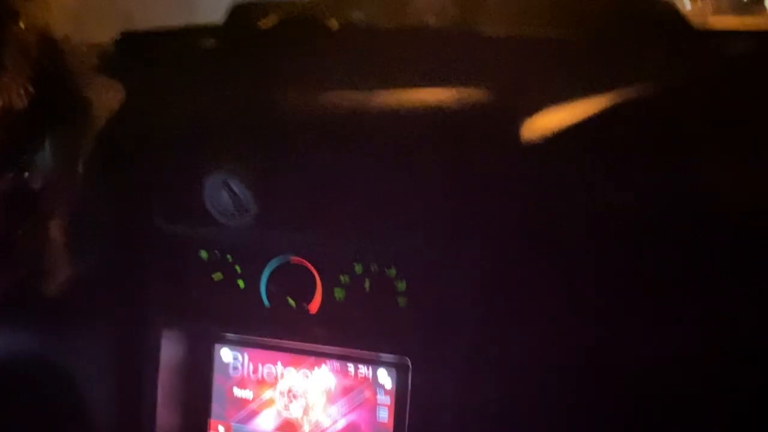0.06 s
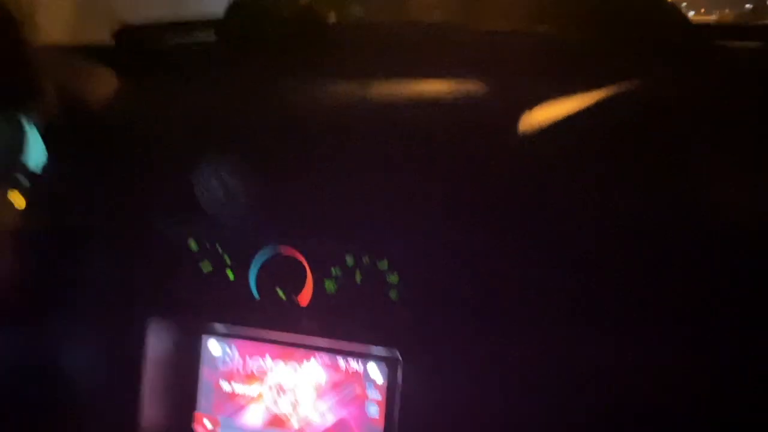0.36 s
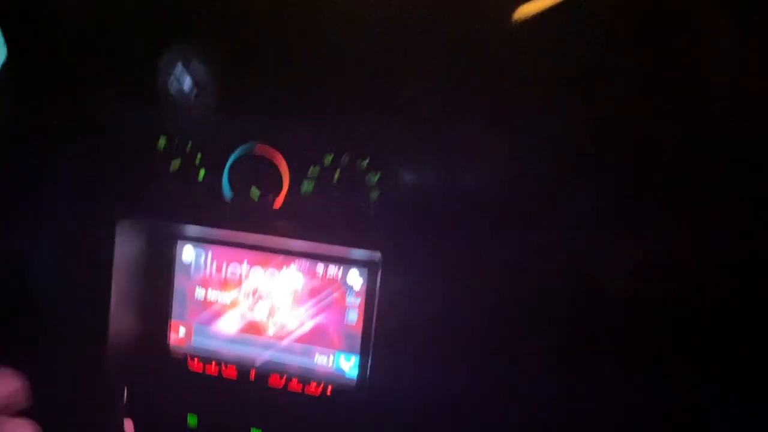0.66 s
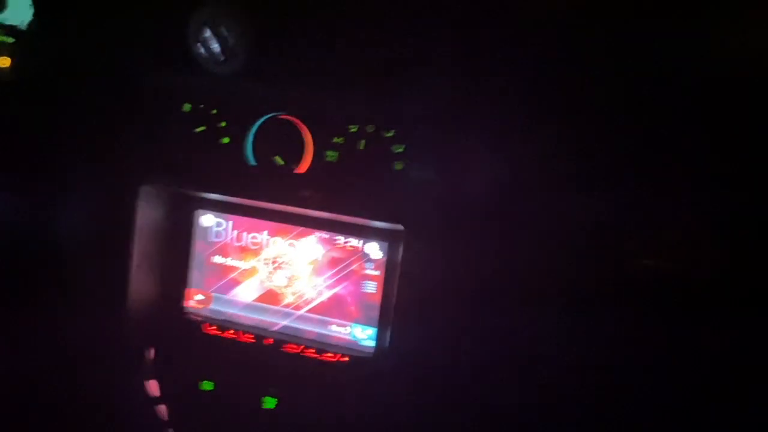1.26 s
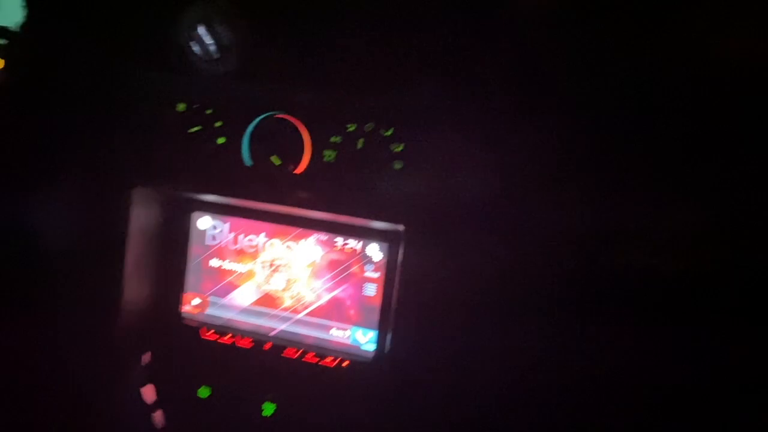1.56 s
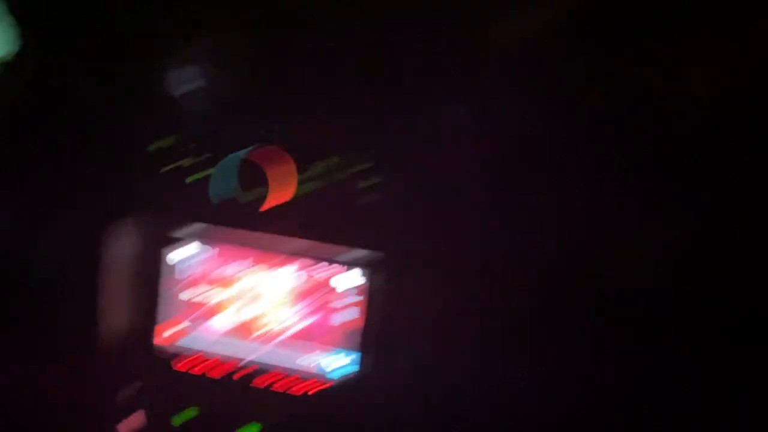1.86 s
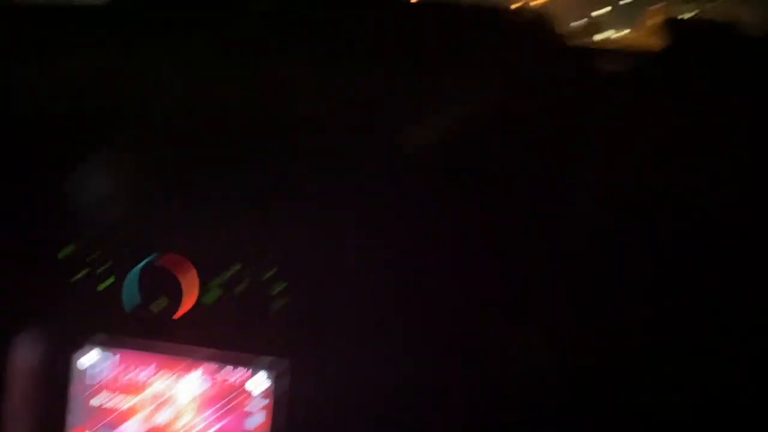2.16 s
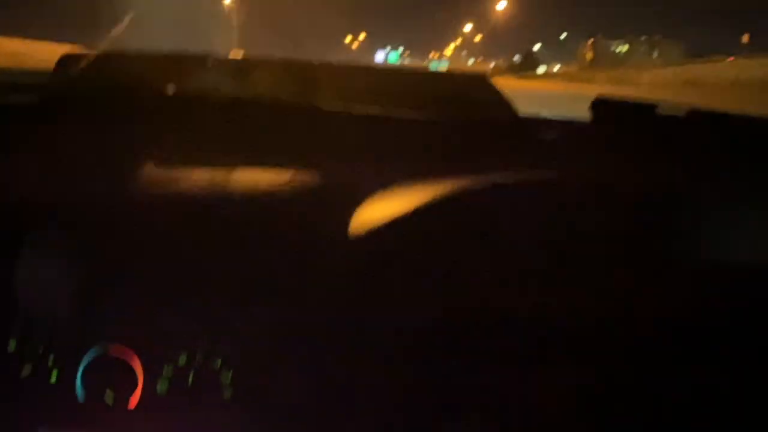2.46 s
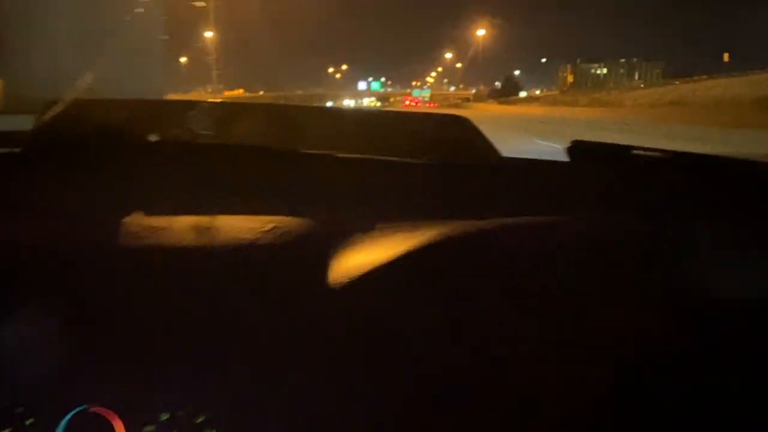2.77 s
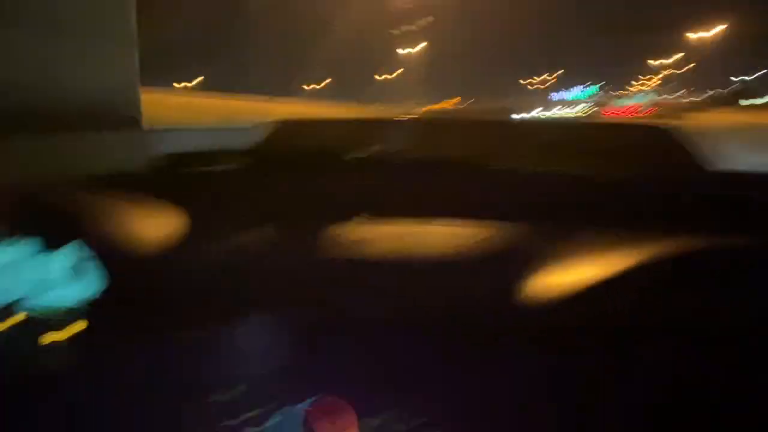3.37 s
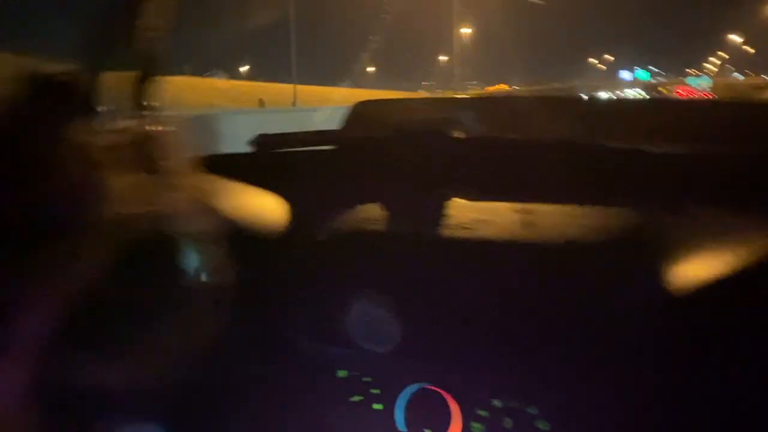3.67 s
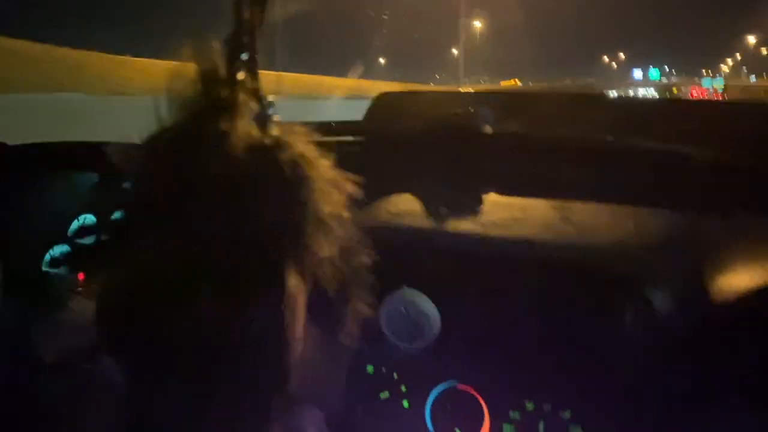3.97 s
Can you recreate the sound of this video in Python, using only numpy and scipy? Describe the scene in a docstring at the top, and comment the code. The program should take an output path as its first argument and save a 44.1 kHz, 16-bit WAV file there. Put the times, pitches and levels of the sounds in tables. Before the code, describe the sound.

From inside a moving car, the engine winds down to a quiet rumble while something small ticks faintly. The throttle then opens, and the drone rises in pitch and grows into a loud, rough, rushing roar.

```python
"""V8 car at night, from inside.

The revs sag, then the throttle opens: the exhaust drone climbs through the cabin's resonances and turns
throaty as the cylinders fire unevenly. Intake air, pulsing with the firings, swells to a loud rush over
the road rumble. Something small ticks lightly in the cabin while the engine is quiet."""
import sys
import numpy as np
from scipy.fft import rfft, irfft, next_fast_len
from scipy.io import wavfile
from scipy.ndimage import uniform_filter1d, minimum_filter1d, map_coordinates

SR = 44100
rng = np.random.default_rng(int(sys.argv[2]) if len(sys.argv) > 2 else 0)


def log_audio(samples):
    """Write samples as a 16-bit WAV file to the path given in sys.argv[1]."""
    # one column per channel
    frames = np.atleast_2d(samples).T
    # limit to full scale, then quantise
    limited = np.clip(frames, -1, 1)
    pcm = np.round(limited * 32767).astype(np.int16)
    wavfile.write(sys.argv[1], SR, pcm)


N = 176400

# Phase lead, left over right: freq_hz, lead_rad
STEREO_LEAD = [(50, 0), (150, 0.38), (210, 1.5), (260, 2), (350, 2), (500, 4), (1300, 3.5)]
# Left-right likeness of noise: freq_hz, correlation
STEREO_CORRELATION = [(50, 0.99), (130, 0.81), (220, 0.37), (380, 0.077), (700, -0.23), (1300, -0.65),
                      (2300, 0.22), (4400, 0.25), (8000, 0.023), (15000, -0.0073)]
# Exhaust-to-cabin response: freq_hz, gain_db
CABIN_RESPONSE = [(30, -9.5), (42, 1), (56, 12), (72, 3.5), (90, 0.5), (105, -1), (125, 2.45), (150, 3),
                  (180, -2.5), (205, -5), (260, -9), (300, -26), (345, -14), (380, -19), (405, -6),
                  (440, -14), (495, -22), (550, -23.5), (615, -8), (690, -37), (770, -22), (950, -27.5),
                  (1200, -38)]
# Resonances and nulls per order (multiple of the cycle rate): order, centre_hz, half_width_hz, gain_db
CABIN_MODES = [(2, 64, 7, -3), (3, 54, 7, 2), (4, 138, 14, -4), (5, 56, 11, 4), (5, 88, 10, -7),
               (5, 150, 9, 4), (5, 170, 14, 3), (6, 128, 14, 3), (6, 165, 12, -4), (7, 126, 10, -8),
               (7, 171, 9, -8), (8, 208, 17, 7), (11, 195, 18, 8), (11, 275, 30, 9), (11, 345, 14, 15.5),
               (12, 330, 70, 5), (16, 143, 9, 2), (16, 187, 30, -14), (16, 295, 14, 5), (16, 345, 25, 15),
               (16, 402, 22, 6), (16, 487, 18, 19), (19, 355, 35, 11), (22, 398, 16, 7), (24, 765, 25, 14),
               (27, 940, 18, 26)]

# Road rumble: time_s, level_db
RUMBLE_LEVELS = [(0, -36), (.4, -30.5), (.9, -23.5), (1.6, -33.5), (2.2, -20), (2.7, -24), (3.3, -24.5),
                 (4, -25)]
# Cabin ticks, before trim: start_s, clack_db, snap_db
TICKS = [(.145, -66, -58), (.672, -59, -55), (.72, -55, -49), (.835, -52, -48), (.845, -43.5, -44),
         (.87, -52, -58), (.965, -58, -55), (1.093, -51, -55), (1.166, -56, -55), (1.32, -57, -55),
         (1.447, -49, -46.5), (1.66, -45, -46), (1.679, -40.5, -36.5), (1.826, -45, -51)]
# Engine whines: order, peak_s, sigma_s, level_db
WHINES = [(48, .5, .17, -51), (80, .27, .12, -60)]
# Fixed-pitch hums: pitch_hz, peak_s, sigma_s, level_db
HUMS = [(499, .65, .3, -46), (1310, .56, .1, -55)]
# Throttle whistles: peak_s, sigma_s, pitch_hz, half_width_hz, level_db
WHISTLES = [(1.52, .06, 3850, 300, -62), (3.26, .09, 7450, 130, -48)]

# Noise spectra of road, ticks and intake: freq_hz, relative_db
RUMBLE_SPECTRUM = [(20, -34.5), (35, -23.5), (52, 7.5), (65, -4), (85, -13), (130, 1), (200, -9),
                   (300, -19), (600, -31.5), (1500, -79.5)]
AIR_TYRE_SPECTRUM = [(150, -18), (350, -5), (470, 1.5), (720, 1.5), (1000, -8.5), (1400, -9), (1800, -19),
                     (2300, -24), (3200, -29), (3800, -26), (5000, -28.5), (7000, -39), (9000, -39),
                     (11000, -37), (15500, -49)]
CLACK_SPECTRUM = [(1500, -29.5), (2700, -11.5), (3500, 3), (6500, -3), (8500, -7.5), (12000, -29.5)]
SNAP_SPECTRUM = [(6000, -35), (8800, -9), (10800, 6.5), (13000, -6), (15500, -15.5)]
ROAR_SPECTRUM = [(150, -31), (260, -0.5), (350, 5.5), (378, -1), (402, 6.5), (450, -7), (555, -15),
                 (690, -6.5), (780, -1), (860, -1.5), (935, 0.5), (980, -8.5), (1025, -2), (1090, -12),
                 (1230, -13.5), (2500, -64.5)]
HONK_SPECTRUM = [(380, -30.5), (460, -7), (497, 5), (550, -10), (612, -0.5), (690, -3.5), (800, -5.5),
                 (1100, -43.5)]
RUSH_SPECTRUM = [(600, -31.5), (1080, -2), (1230, 2), (1330, 0), (1650, 0.5), (1980, -5), (2150, -4),
                 (2600, -7.5), (3300, -11.5), (4200, -18.5), (7000, -40.5)]
HISS_SPECTRUM = [(2000, -20), (3800, 1), (5200, 1.5), (5480, -3.5), (5800, -1), (6700, -0.5), (7400, -1),
                 (8700, -7), (10500, -4), (12000, -6.5), (13300, -26), (15500, -6)]

# Engine speed: time_s, speed_rpm
REVS = [(0.0, 2520), (0.15, 2392), (0.35, 2245), (0.64, 2173), (0.8, 1938), (1.0, 1600), (1.2, 1299),
        (1.4, 1035), (1.6, 1263), (1.85, 1485), (2.05, 1736), (2.3, 2045), (2.55, 2376), (2.8, 2760),
        (3.05, 3043), (3.35, 3428), (3.7, 3862), (4.0, 4240)]
# Intake strength, before trim: time_s, roar_db, rush_db, hiss_db
INTAKE_LEVELS = [(0, -56.5, -65.5, -78), (.35, -51, -65.5, -74), (.6, -41, -54.5, -67.5),
                 (.8, -42, -57.5, -66.5), (1.1, -53, -61.5, -71.5), (1.4, -55.5, -62, -70),
                 (1.75, -48.5, -56.5, -66), (2.05, -42.5, -54.5, -61), (2.35, -29, -44.5, -54.5),
                 (2.6, -28, -40, -45.5), (2.92, -24.5, -34.5, -41.5), (3.25, -24.5, -33, -43.5),
                 (3.5, -23, -32, -43.5), (3.75, -24.5, -32.5, -44.5), (4, -25.5, -28, -39)]
# Exhaust drive: time_s, firing_db, burble_db
EXHAUST_DRIVE = [(0, -32, -24), (0.1, -36.5, -34), (0.165, -22, -27.5), (0.28, -15.5, -35.5),
                 (0.65, -15.5, -24), (1, -20.5, -29.5), (1.15, -29, -28.5), (1.4, -22.5, -34.5),
                 (1.55, -26, -27.5), (1.7, -28, -28), (1.85, -17, -22), (2.1, -14.5, -21.5),
                 (2.45, -14.5, -12.5), (2.62, -20, -10.5), (2.9, -28, -9.7), (3.03, -15.5, -9.5),
                 (3.2, -14.5, -5.5), (3.6, -14.5, -7), (4, -5, -2)]
# Exhaust orders 2-16: order, gain_db, left_minus_right_db
LOW_ORDERS = [(2, -23.5, -16.5), (3, -23, -4), (4, -19, -1), (5, -13.5, -10), (6, -15, -3.5),
              (7, -15, -7.5), (8, -2.5, -2.5), (9, -15, -14), (10, -17, -2), (11, -10, -0.5), (12, -18, 3),
              (13, -10, -1), (14, -15.5, 0.5), (15, -15, -4.5), (16, -6.5, -7.5)]
# Firing unevenness: time_s, roughness_0_to_1
ROUGHNESS = [(.65, .08), (.95, .3), (1.1, .7), (1.4, .3), (1.65, .7), (2.05, .35), (2.4, .35), (2.62, .9),
             (2.95, .9), (3.2, .5), (3.5, .22), (4, .22)]

CYLINDERS = 8
TIME_S = np.arange(N) / SR


def amp(db):
    """Decibels to gain."""
    return 10 ** (np.asarray(db) / 20)


def unit_rms(x):
    """Scale to rms 1."""
    return x / np.sqrt(np.mean(x ** 2) + 1e-20)


def at_hz(table, hz):
    """Interpolate (freq_hz, value) rows on a log axis."""
    freqs_hz, values = np.transpose(table)
    return np.interp(np.log(hz + 1), np.log(freqs_hz + 1), values)


def curves(table):
    """Per-sample curve for each column after time_s."""
    times_s, *columns = np.transpose(table)
    return [np.interp(TIME_S, times_s, column) for column in columns]


def wobble(rate_hz):
    """Smooth random curve, rate_hz knots a second."""
    return map_coordinates(rng.standard_normal(int(N * rate_hz / SR) + 4), [TIME_S * rate_hz])


def cycle_wobble(cycle_rad, knots_per_cycle=3):
    """Smooth random curve paced by the engine cycle."""
    position = cycle_rad / (2 * np.pi) * knots_per_cycle
    return map_coordinates(rng.standard_normal(int(position[-1]) + 4), [position])


def swell(peak_s, sigma_s):
    """Gaussian envelope."""
    return np.exp(-.5 * ((TIME_S - peak_s) / sigma_s) ** 2)


def strike(start_s, t60_s, attack_s=.002):
    """Fast rise, exponential decay."""
    age_s = np.maximum(TIME_S - start_s, 0)
    return (1 - np.exp(-age_s / attack_s)) * np.exp(-np.log(1000) * age_s / t60_s)


def filtered(x, response):
    """FFT filter with gain response(hz)."""
    size = next_fast_len(N + SR // 2)
    return irfft(rfft(x, size) * response(np.fft.rfftfreq(size, 1 / SR)), size)[..., :N]


def pan(pan_db):
    """Stereo gains of mean power 1; positive is left."""
    return unit_rms(amp(np.array([[pan_db], [-pan_db]]) / 2))


def noise_band(centre_hz, half_width_hz):
    """Narrow stereo noise, rms 1."""
    white = rng.standard_normal((2, N))
    return unit_rms(filtered(white, lambda hz: np.exp(-((hz - centre_hz) / half_width_hz) ** 2)))


def stereo_noise(spectrum, pan_db):
    """Coloured stereo noise of rms 1, centred in the bass and wide in the midrange."""
    def mid_side_gains(hz):
        spread_rad = np.arccos(at_hz(STEREO_CORRELATION, hz)) / 2
        return amp(at_hz(spectrum, hz)) * [np.cos(spread_rad), np.sin(spread_rad)]
    mid, side = filtered(rng.standard_normal((2, N)), mid_side_gains)
    return unit_rms(np.array([mid + side, mid - side])) * pan(pan_db)


def stereo_tone(phase_rad, hz):
    """Sine of rms 1; left leads right by a pitch-dependent phase, widening the midrange."""
    lead_rad = at_hz(STEREO_LEAD, hz) * np.array([[.5], [-.5]])
    return np.sqrt(2) * np.sin(phase_rad + rng.uniform(0, 2 * np.pi) + lead_rad)


def standing_waves(x, depth_db=2.3, spacing_hz=24):
    """Dense cabin modes add narrow fixed peaks and dips; rms 1."""
    knots_db = depth_db * rng.standard_normal(int(SR / spacing_hz))
    return unit_rms(filtered(x, lambda hz: amp(map_coordinates(knots_db, [hz / spacing_hz]))))


def road(air_tyre_db=-44.5):
    """Body rumble plus steady air and tyre noise."""
    rumble_db, = curves(RUMBLE_LEVELS)
    rumble = amp(rumble_db) * stereo_noise(RUMBLE_SPECTRUM, pan_db=-6)
    return rumble + amp(air_tyre_db) * stereo_noise(AIR_TYRE_SPECTRUM, pan_db=1)


def ticks(t60_s=.038, trim_db=-3, ping_db=-49):
    """Dry ticks, each a mix of clack and bright snap; one rings."""
    clack_envelope = sum(amp(db) * strike(start_s, t60_s) for start_s, db, _ in TICKS)
    snap_envelope = sum(amp(db) * strike(start_s, t60_s) for start_s, _, db in TICKS)
    clack = clack_envelope * stereo_noise(CLACK_SPECTRUM, pan_db=4.5)
    snap = snap_envelope * stereo_noise(SNAP_SPECTRUM, pan_db=-1.5)
    ping = strike(start_s=.869, t60_s=.06) * noise_band(centre_hz=2480, half_width_hz=170)
    return amp(trim_db) * (clack + snap) + amp(ping_db) * ping


def hums():
    """Two fixed pitches swell and fade."""
    return sum(amp(db) * swell(peak_s, sigma_s) * stereo_tone(2 * np.pi * hz * TIME_S, hz)
               for hz, peak_s, sigma_s, db in HUMS)


def whines(cycle_rad):
    """Faint high engine orders, falling with the revs."""
    stereo_rad = np.array([[0], [1]])
    return sum(amp(db) * swell(peak_s, sigma_s) * np.sin(order * cycle_rad + stereo_rad)
               for order, peak_s, sigma_s, db in WHINES)


def whistles():
    """Air whistles briefly past the throttle."""
    return sum(amp(db) * swell(peak_s, sigma_s) * noise_band(hz, half_width_hz)
               for peak_s, sigma_s, hz, half_width_hz, db in WHISTLES)


def crank(jitter=.002):
    """Rate and phase of the four-stroke cycle: two revolutions each."""
    rpm, = curves(REVS)
    cycle_hz = uniform_filter1d(rpm, size=4000) / 120
    cycle_hz *= 1 + jitter * wobble(rate_hz=25)
    return cycle_hz, 2 * np.pi * np.cumsum(cycle_hz) / SR


def intake(cycle_hz, cycle_rad, surge_db=1.05, honk_db_per_krpm=5):
    """Indrawn air pulses with the firings and the crank; its midrange honk opens with the revs."""
    gulps = unit_rms(np.cos(CYLINDERS * cycle_rad) + .47 * np.cos(2 * cycle_rad) + .39 * np.cos(cycle_rad))

    def pulsed(air, depth, trim_db):
        return amp(trim_db) * unit_rms(np.exp(depth * gulps / 2) * air)

    roar_db, rush_db, hiss_db = curves(INTAKE_LEVELS)
    roar_db += surge_db * wobble(rate_hz=9)
    above_mean_krpm = (cycle_hz - cycle_hz.mean()) * 120 / 1000
    honk_db = roar_db + honk_db_per_krpm * above_mean_krpm
    roar = pulsed(stereo_noise(ROAR_SPECTRUM, pan_db=-1.5), depth=.22, trim_db=2)
    honk = pulsed(stereo_noise(HONK_SPECTRUM, pan_db=-4.5), depth=.22, trim_db=-8.5)
    rush = pulsed(standing_waves(stereo_noise(RUSH_SPECTRUM, pan_db=.5)), depth=.17, trim_db=3)
    hiss = pulsed(standing_waves(stereo_noise(HISS_SPECTRUM, pan_db=1.5)), depth=.17, trim_db=3.5)
    return amp(roar_db) * roar + amp(honk_db) * honk + amp(rush_db) * rush + amp(hiss_db) * hiss


def exhaust(cycle_hz, cycle_rad):
    """Firing note and burble of uneven cylinder banks sweep through the cabin's resonances."""
    stumble_db, stumble_rad = 2.3, .027  # firing scatter at full roughness
    waver_db_per_order, burble_waver_db = .1783, 2.6
    high_order_db, firing_lift_db = -15, 5.5
    firing_db, burble_db = curves(EXHAUST_DRIVE)
    roughness, = curves(ROUGHNESS)
    uneven_rad = cycle_rad + stumble_rad * roughness * cycle_wobble(cycle_rad)
    high_orders = [(order, high_order_db + firing_lift_db * (order % CYLINDERS == 0), 0)
                   for order in range(17, 40)]
    drone = np.zeros((2, N))
    for order, gain_db, pan_db in list(LOW_ORDERS) + high_orders:
        hz = order * cycle_hz
        drive_db = firing_db if order in (CYLINDERS, 2 * CYLINDERS) else burble_db
        waver_db = np.hypot(waver_db_per_order * order, burble_waver_db * (order % CYLINDERS != 0))
        modes_db = sum(db * np.exp(-((hz - centre_hz) / half_width_hz) ** 2)
                       for mode_order, centre_hz, half_width_hz, db in CABIN_MODES if mode_order == order)
        cabin_db = at_hz(CABIN_RESPONSE, hz) + modes_db
        level_db = drive_db + gain_db + cabin_db + waver_db * wobble(rate_hz=8)
        drone += amp(level_db) * pan(pan_db) * stereo_tone(order * uneven_rad, hz)
    return drone * amp(stumble_db * roughness * cycle_wobble(uneven_rad))


def scene():
    """Mix at the front seat."""
    cycle_hz, cycle_rad = crank()
    engine = exhaust(cycle_hz, cycle_rad) + whines(cycle_rad)
    return engine + hums() + intake(cycle_hz, cycle_rad) + whistles() + road() + ticks()


def record(dry, ceiling=.88, hold_s=.02, cutoff_hz=15900):
    """Peak limiter, then brick-wall low-pass."""
    hold_samples = int(hold_s * SR)
    needed_gain = ceiling / np.maximum(np.abs(dry).max(axis=0), ceiling)
    gain = uniform_filter1d(minimum_filter1d(needed_gain, hold_samples), hold_samples)
    return filtered(dry * gain, lambda hz: hz < cutoff_hz)


dry = scene()
out = record(dry)
log_audio(out)
```